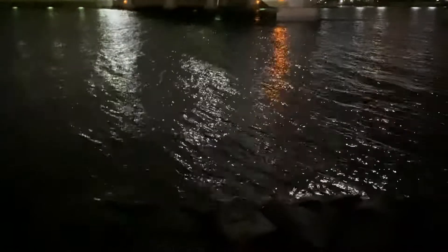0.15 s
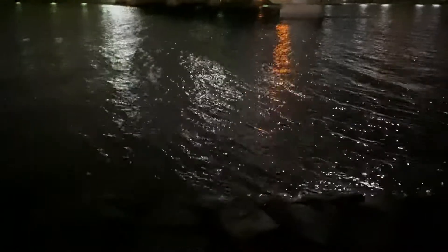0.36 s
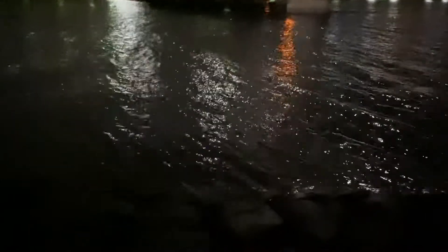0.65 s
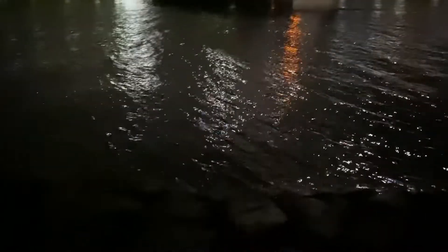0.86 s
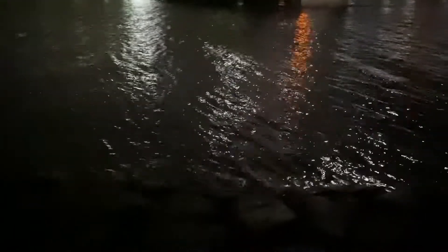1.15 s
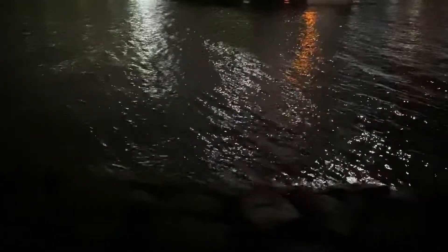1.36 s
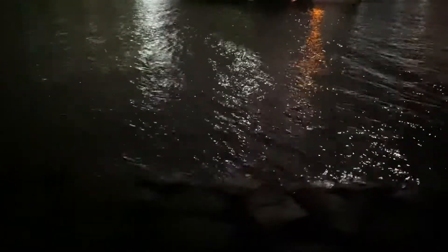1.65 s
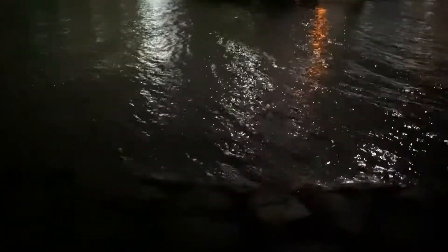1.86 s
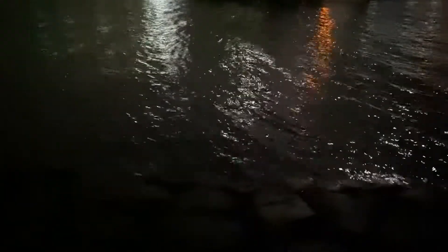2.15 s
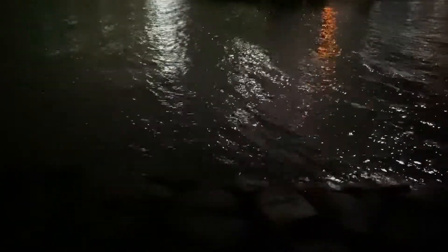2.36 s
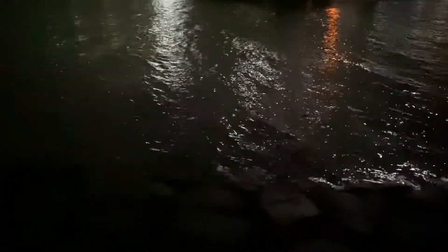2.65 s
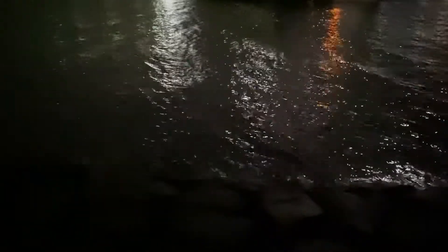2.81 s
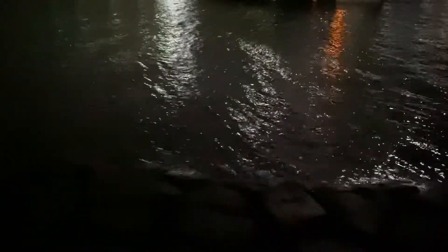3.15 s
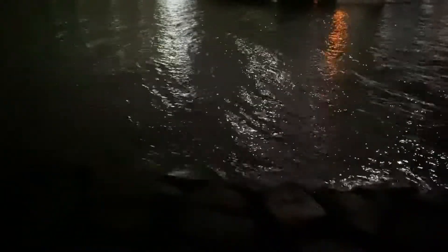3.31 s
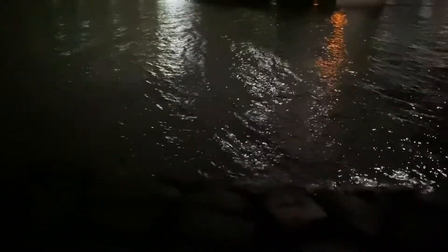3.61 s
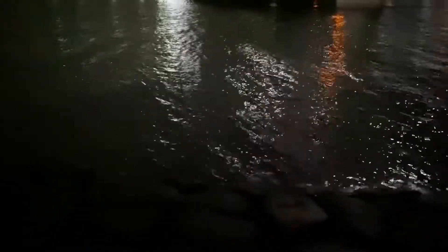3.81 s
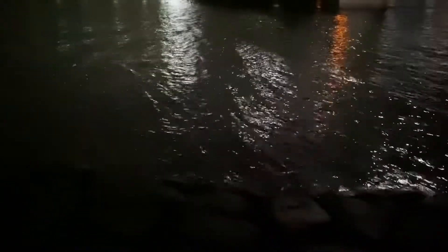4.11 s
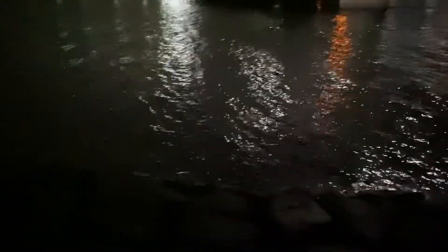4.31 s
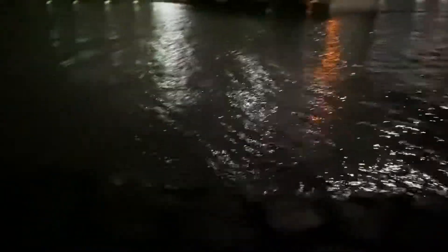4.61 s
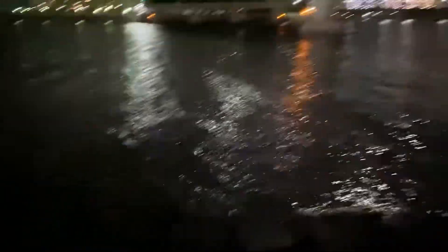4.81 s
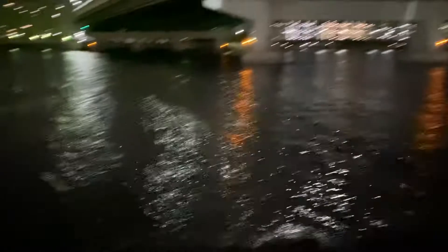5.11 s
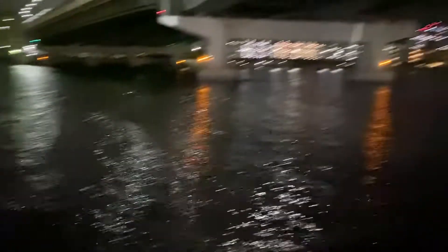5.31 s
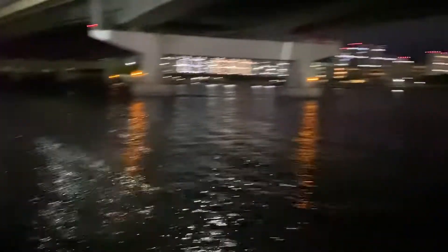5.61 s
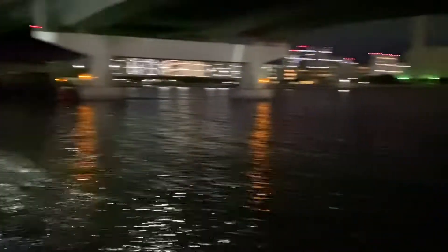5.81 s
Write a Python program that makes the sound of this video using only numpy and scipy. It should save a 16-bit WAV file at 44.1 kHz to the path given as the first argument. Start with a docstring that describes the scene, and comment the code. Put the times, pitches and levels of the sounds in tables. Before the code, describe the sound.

Small waves plop, slap and fizz among rocks at night, while wind rumbles on the microphone and a vehicle swells past on a bridge.

```python
"""Small waves slap, clap and fizz among rocks at the foot of a harbour seawall at night; drops fall back.
The water is built from bubble tones, ticks, short noise bursts and foam hiss, with a scattered tail.
A vehicle of shaped noise swells on a road bridge to the right and thumps over a joint.
Wind rumble buffets the microphone over the noise of a far city; the microphone turns towards the bridge."""
import sys
import numpy as np
from scipy import signal
from scipy.fft import rfft, irfft, next_fast_len
from scipy.io import wavfile
from scipy.ndimage import uniform_filter1d, map_coordinates

SR = 44100
rng = np.random.default_rng(int(sys.argv[2]) if len(sys.argv) > 2 else 0)


def bounce(signal):
    """Save signal as a 16-bit WAV file at the path given by the first command-line argument."""
    frames = np.transpose(np.atleast_2d(signal))
    limited = np.clip(frames, -1, 1)
    pcm = np.round(limited * 32767).astype(np.int16)
    wavfile.write(sys.argv[1], SR, pcm)


N = 262836
TIME = np.arange(N) / SR
FREQS = np.maximum(np.fft.rfftfreq(N, 1 / SR), 1)

# bearings run to the right from the microphone's first heading
TURN_START_S, TURN_LENGTH_S, TURN_DEG = 4.43, 0.94, 39.8
SPRAY_BEARING_DEG, ROAD_BEARING_DEG, PORT_LAG_MS = 35, 70.6, 0.39


def from_db(db):
    """Decibels to gain."""
    return 10 ** (np.asarray(db) / 20)


def rms_one(x):
    """Scale to unit rms."""
    return x / np.sqrt(np.mean(x ** 2) + 1e-20)


def at_hz(points, hz):
    """Interpolate a table on a log-frequency axis."""
    table_hz, value = np.transpose(points)
    return np.interp(np.log(hz), np.log(table_hz), value)


def drift(hz):
    """Slow random curve, rms 1, low-passed at hz."""
    return rms_one(irfft(rfft(rng.standard_normal(N)) / (1 + (FREQS / hz) ** 2), N))


def stereo_noise(colour, likeness):
    """Noise of the given colour, partly shared by both sides; rms 1."""
    mid, side = rfft(rng.standard_normal((2, N)))
    pair = np.sqrt(1 + likeness) * mid + np.sqrt(1 - likeness) * side * [[1], [-1]]
    return rms_one(irfft(pair * from_db(at_hz(colour, FREQS)) * (FREQS > 10), N))


def turned(s=TIME):
    """How far the microphone has turned, 0-1."""
    return np.clip((s - TURN_START_S) / TURN_LENGTH_S, 0, 1)


def lag_of(bearing_deg, s=TIME):
    """Lag of the left side in ms for a source at this bearing, as the microphone turns."""
    return PORT_LAG_MS * np.sin(np.radians(bearing_deg - TURN_DEG * turned(s)))


def from_right(pair, lag_ms):
    """Sound from the right reaches the left side later."""
    late = np.arange(pair.shape[1]) - lag_ms * SR / 1000
    left = map_coordinates(pair[0], [late], order=3, mode="nearest")
    return np.array([left, pair[1]])


def add(out, s, sound):
    """Mix a short sound in at time s."""
    part = out[max(int(s * SR), 0):][:len(sound)]
    part += sound[:len(part)]


def placed(sound, s, bearing_deg):
    """A short sound at time s from this bearing, as a stereo track."""
    out = np.zeros((2, N))
    add(out[0], s + lag_of(bearing_deg, s) / 1000, sound)
    add(out[1], s, sound)
    return out


# Far city spectrum. Each row: frequency in Hz, relative density in dB per Hz.
CITY_COLOUR_DB = [(30, 6), (100, 4.5), (220, 2), (300, 1), (380, 0), (600, -11), (850, -6.5), (1400, -16),
                  (2000, -18.5), (3000, -30.5), (4500, -36), (8000, -65), (16000, -54.5)]
# Left-right likeness of the city. Each row: frequency in Hz, likeness 0-1.
CITY_LIKENESS_BY_HZ = [(60, 1), (200, 0.81), (400, 0), (800, 0.05), (1500, 0.05), (5000, 1)]


def city(level_db=-49, bridge_share=0.36):
    """Far traffic arrives from all sides; part of its tyre noise comes from the bridge on the right."""
    share = bridge_share / (1 + (350 / FREQS) ** 4) / (1 + (FREQS / 1600) ** 6)
    around = rfft(stereo_noise(CITY_COLOUR_DB, at_hz(CITY_LIKENESS_BY_HZ, FREQS)))
    bridge = rfft(from_right(stereo_noise(CITY_COLOUR_DB, 1.0), lag_of(ROAD_BEARING_DEG)))
    return from_db(level_db) * irfft(np.sqrt(1 - share) * around + np.sqrt(share) * bridge, N)


RUMBLE_FLOOR_DB, GUST_ATTACK_S, GUST_RELEASE_S = -45.5, 0.01, 0.056
# Gusts on the microphone. Each row: start in seconds, hold in seconds, strength in dB.
GUST_EVENTS = [(0.83, 0.079, -44), (1.518, 0.33, -37.5), (1.819, 0.41, -31), (2.31, 0.11, -28.5),
               (2.44, 0.8, -38), (2.79, 0.042, -37), (2.928, 0.019, -31), (3.046, .025, -41),
               (3.272, 0.035, -26.5), (3.33, 0.16, -39), (3.534, 1.25, -30.5), (3.543, 0.067, -25),
               (3.685, 0.055, -27.5), (3.854, 0.042, -27), (4.046, 0.14, -25), (4.293, 0.02, -25.5),
               (4.524, 0.023, -24), (4.687, 0.046, -25.5), (4.824, 0.36, -35.5), (5.256, 0.43, -32),
               (5.513, 0.026, -30.5), (5.614, 0.031, -45), (5.756, 0.18, -33.5)]


def wind_strength():
    """Each gust rises quickly, holds and dies away, over a faint steady low rumble."""
    power = from_db(RUMBLE_FLOOR_DB) ** 2
    for start_s, hold_s, db in GUST_EVENTS:
        attack = np.clip((TIME - start_s) / GUST_ATTACK_S, 0, 1)
        release = np.exp(-np.maximum(TIME - start_s - hold_s, 0) / GUST_RELEASE_S)
        power = power + (from_db(db) * attack * release) ** 2
    return np.sqrt(power)


# Wind spectrum. Each row: frequency in Hz (doubled for the puffs), relative density in dB per Hz.
WIND_COLOUR_DB = [(18, -32), (30, -21.5), (40, -10), (50, 5.5), (64, 4.5), (80, 6), (105, -4), (140, -14),
                  (200, -29), (400, -44.5), (3000, -110)]
# Sharp puffs. Each row: centre in seconds, half width in seconds, level in dB.
PUFF_EVENTS = [(1.66, 0.13, -49.5), (1.908, 0.061, -38), (2.25, 0.26, -45), (2.68, 0.12, -51),
               (2.94, 0.074, -41), (3.11, 0.081, -42), (3.3, 0.028, -36.5), (4.201, 0.062, -35),
               (4.439, 0.024, -29), (4.571, 0.034, -34.5), (4.73, 0.037, -29)]


def wind(likeness=0.95, steadiness=0.51, low_cut_hz=35):
    """Eddies thud on both ports together; sharp puffs bring smaller, higher eddies."""
    eddies = stereo_noise(WIND_COLOUR_DB, likeness)
    local_power = uniform_filter1d(np.mean(eddies ** 2, axis=0), size=SR // 16)
    # partly level the chance swells of the noise
    rumble = wind_strength() * eddies / local_power ** (steadiness / 2)
    puffs = sum(from_db(db) * np.exp(-((TIME - s) / width_s) ** 2) for s, width_s, db in PUFF_EVENTS)
    buffet = puffs * stereo_noise([(2 * hz, db) for hz, db in WIND_COLOUR_DB], 0.88)
    high_pass = signal.butter(4, low_cut_hz, "high", fs=SR, output="sos")
    return signal.sosfilt(high_pass, rumble + buffet)


NEAREST_S, SPEED_M_PER_S, ROAD_DISTANCE_M = 5.19, 22.36, 33.1
# screened until it comes out on the open bridge
EMERGES_S, EMERGE_SPREAD_S, SCREEN_DB = 3.29, 0.15, -12.5


def drive_past():
    """Level in dB by distance and screening, and angle in radians to go, at a steady speed."""
    to_go_m = SPEED_M_PER_S * (NEAREST_S - TIME)
    spreading_db = 20 * np.log10(ROAD_DISTANCE_M / np.hypot(ROAD_DISTANCE_M, to_go_m))
    screened = .5 - .5 * np.tanh(.5 * (TIME - EMERGES_S) / EMERGE_SPREAD_S)
    return spreading_db + SCREEN_DB * screened, np.arctan2(to_go_m, ROAD_DISTANCE_M)


def patchy(pair, patchy_db, patch_hz, count=12):
    """Each stretch of the spectrum swells and fades by itself; rms 1."""
    place = np.interp(np.log(FREQS), np.log([250, 4000]), [0, count - 1])
    spectrum = rfft(pair)
    bands = (irfft(spectrum * np.maximum(1 - abs(place - k), 0), N) for k in range(count))
    return rms_one(sum(band * from_db(patchy_db * drift(patch_hz)) for band in bands))


# delay at the nearest point, its growth per radian still to go, level
ECHO_MS, ECHO_MS_PER_RAD, ECHO_DB = 17, 4.14, -13


def with_echo(pair, delay_ms):
    """Sound returning from under the bridge by a slowly changing path; power is kept."""
    late = np.arange(N) - delay_ms * SR / 1000
    echo = np.array([np.interp(late, np.arange(N), side) for side in pair])
    return (pair + from_db(ECHO_DB) * echo) / np.hypot(1, from_db(ECHO_DB))


# Tyres crossing the bridge joint. Each row: start in seconds, base level in dB, pitch in Hz.
THUMP_EVENTS = [(5.275, -23, 142), (5.306, -29, 313), (5.614, -27, 191)]
# Ringing deck spectrum. Each row: frequency in Hz, relative density in dB per Hz.
BOOM_COLOUR_DB = [(60, -3), (110, 5.5), (180, 6), (260, -5), (400, -15), (600, -23), (1000, -18),
                  (2000, -41), (5000, -78)]


def joint(boom_db=-9, boom_s=0.14, knock_db=7, knock_cycles=0.45):
    """Tyres knock on the bridge joint, and each knock makes the deck boom."""
    boom = knocks = 0
    for s, db, hz in THUMP_EVENTS:
        age = np.maximum(TIME - s, 0)
        boom = boom + from_db(db + boom_db) * (1 - np.exp(-age * hz)) * np.exp(-age / boom_s)
        swing = age * hz / knock_cycles
        pulse = 2 * swing * np.exp(-swing)
        knocks = knocks + from_db(db + knock_db) * np.sin(2 * np.pi * hz * age) * pulse
    return boom * stereo_noise(BOOM_COLOUR_DB, 0.99) + knocks


# Tyre roar spectrum. Each row: frequency in Hz, relative density in dB per Hz.
TYRE_COLOUR_DB = [(200, 0.5), (380, 6), (500, 0.5), (590, -1), (700, 1), (820, -1.5), (980, -1.5),
                  (1170, -5.5), (1450, -13.5), (1750, -14.5), (2200, -25.5), (3500, -34), (9000, -64),
                  (16000, -71)]
# Low drone spectrum. Each row: frequency in Hz, relative density in dB per Hz.
DRONE_COLOUR_DB = [(50, -0.5), (110, 12.5), (170, 9), (250, 9.5), (310, 0), (380, 2), (520, -8),
                   (800, -43.5), (5000, -102.5)]
# Hiss of air squeezed from the tread. Each row: frequency in Hz, relative density in dB per Hz.
TREAD_COLOUR_DB = [(500, -33), (1500, 6), (2100, 4.5), (2900, 1), (3700, -7), (5000, -14), (8000, -25.5),
                   (16000, -37)]
# Left-right likeness of the road. Each row: frequency in Hz, likeness 0-1.
ROAD_LIKENESS_BY_HZ = [(100, 0.88), (250, 0.83), (600, 0.65), (1100, 0.52), (2000, 0.84), (4000, 0.19),
                       (8000, 0.34)]
# unscreened at the nearest distance: tyres, drone at right angles, tread on its beam
TYRE_DB, DRONE_DB, TREAD_DB = -36.5, -39.5, -55.5
DRONE_AHEAD_DB = 7.5   # extra drone thrown forwards
# tread hiss is beamed a little ahead; loss at right angles to the beam
TREAD_BEAM_DEG, TREAD_BEAM_DB = 6.4, 21


def vehicle(bass_lag=1.72, bend_hz=760):
    """Tyre roar and tread hiss, each swelling and fading at random by bands, over a low drone."""
    passing_db, angle = drive_past()
    off_beam = angle - np.radians(TREAD_BEAM_DEG)
    tyre_db = TYRE_DB + passing_db
    drone_db = DRONE_DB + passing_db + DRONE_AHEAD_DB * np.sin(angle)
    tread_db = TREAD_DB + passing_db + TREAD_BEAM_DB * (np.cos(off_beam) - 1)
    alike = at_hz(ROAD_LIKENESS_BY_HZ, FREQS)
    roar = from_db(tyre_db) * patchy(stereo_noise(TYRE_COLOUR_DB, alike), patchy_db=2.0, patch_hz=14)
    hiss = from_db(tread_db) * patchy(stereo_noise(TREAD_COLOUR_DB, alike), patchy_db=2.3, patch_hz=25)
    drone = from_db(drone_db) * stereo_noise(DRONE_COLOUR_DB, alike)
    sound = with_echo(roar + hiss + drone, ECHO_MS + ECHO_MS_PER_RAD * angle) + joint()
    # long waves bend round the microphone and lag more
    bass = irfft(rfft(sound) / (1 + (FREQS / bend_hz) ** 10), N)
    lag_ms = lag_of(ROAD_BEARING_DEG + np.degrees(angle))
    return from_right(sound - bass, lag_ms) + from_right(bass, bass_lag * lag_ms)


def bubble(hz, t60, tick_db, tick_s=0.00077, rise=0.038, attack_s=0.00042):
    """A tick as the surface breaks, then a trapped bubble whose pitch rises as it dies; height about 1."""
    t = TIME[:SR // 20]
    pitch_hz = hz * (1 + rise * np.minimum(t / t60, 1))
    tone = np.sin(2 * np.pi * np.cumsum(pitch_hz) / SR) * np.exp(-np.log(1000) * t / t60)
    radius, turn = np.exp(-2.5 * hz / SR), 2 * np.pi * hz / SR
    resonance = [1, -2 * radius * np.cos(turn), radius * radius]
    tick = rng.standard_normal(len(t))
    for _ in range(2):      # a big bubble breaks with a dull tick
        tick = signal.lfilter([1, 0, -1], resonance, tick)
    click = from_db(tick_db) * rms_one(tick) * np.exp(-t / tick_s)
    return (tone + click) * (1 - np.exp(-t / attack_s))


TRICKLE_DB, WASH_RISE_S, WASH_DRAIN_S = -75.5, 0.2, 0.31
# Waves washing in among the rocks. Each row: crest in seconds, fizz strength in dB.
WASH_EVENTS = [(.28, -73.5), (.98, -71), (1.38, -76.5), (2.17, -66), (2.41, -69.5), (3.021, -64.5),
               (3.421, -67), (4.2, -74), (4.8, -70.5), (5.5, -69.5)]


def foam_strength():
    """Each wave whips up foam that drains away, over a constant trickle."""
    power = from_db(TRICKLE_DB) ** 2
    for crest_s, db in WASH_EVENTS:
        swell = np.exp(-np.maximum((crest_s - TIME) / WASH_RISE_S, (TIME - crest_s) / WASH_DRAIN_S))
        power = power + (from_db(db) * swell) ** 2
    return np.sqrt(power)


# Bubble levels. Each row: frequency in Hz, relative level in dB per bubble size.
FIZZ_COLOUR_DB = [(900, -7), (1800, 3.5), (3000, 5.5), (5000, 5), (7200, 6.5), (10000, -1), (15000, -12.5)]
# Fine foam hiss spectrum. Each row: frequency in Hz, relative density in dB per Hz.
FOAM_COLOUR_DB = [(300, -31.5), (1500, -4), (3000, 2), (5500, -9), (7500, -3.5), (10000, -13.5),
                  (16000, -14.5)]
TURNED_AWAY_DB = -1   # loss once the microphone has turned from the rocks


def fizz(level_db=2.0, spread_db=3.5, cycles=42, tick_db=-5, foam_db=-2, flicker_db=2, count=2000):
    """Tiny bubbles of all sizes burst here and there among the rocks, over the hiss of foam."""
    out = np.zeros((2, N))
    for when, size, strength, place in rng.random((count, 4)):
        s, hz = when * N / SR, 1000 * 15 ** size
        db = at_hz(FIZZ_COLOUR_DB, hz) + level_db - spread_db * np.log(max(strength, .09))
        pop = from_db(db) * bubble(hz, cycles / hz, tick_db)
        add(out[1], s, pop)
        add(out[0], s + (place - .55) / 4000, pop)
    foam = from_db(foam_db + flicker_db * drift(42)) * stereo_noise(FOAM_COLOUR_DB, 0.62)
    return (out + foam) * foam_strength() * from_db(TURNED_AWAY_DB * turned())


# Spray landing on stone. Each row: start in seconds, relative level in dB.
TICK_EVENTS = [(0.4803, -50), (1.0211, -51), (1.0364, -59), (1.1034, -43.5), (1.1104, -53), (1.3309, -48),
               (1.4012, -49), (1.4207, -50), (2.1306, -44), (2.3625, -47), (2.5037, -50), (2.5536, -43.5),
               (2.7774, -53), (2.9966, -56), (3.0145, -46), (3.9544, -44), (4.0233, -56), (4.3665, -53),
               (4.7321, -49), (5.0144, -47), (5.466, -44), (5.4974, -55)]


def spray(level_db=-2, decay_s=0.00097, low_hz=2200, high_hz=9000):
    """Flying droplets hit the stone with a dry, bright click of band-passed noise."""
    out, t = np.zeros(N), TIME[:SR // 100]
    for s, db in TICK_EVENTS:
        add(out, s, from_db(db + level_db) * rng.standard_normal(len(t)) * np.exp(-t / decay_s))
    band = signal.butter(1, [low_hz, high_hz], "band", fs=SR, output="sos")
    return signal.sosfilt(band, out + 1e-18)


# Nearest drops. Each row: start in seconds, level in dB, pitch in Hz,
# t60 in seconds before ring_share, bearing in degrees.
DROP_EVENTS = [(.236, -41, 760, 0.049, 38), (.246, -49, 2800, 0.018, 23), (0.266, -57, 7360, 0.029, 35),
               (0.437, -40, 1010, 0.04, 30), (.440, -41, 726, 0.041, 33), (.465, -49, 1700, 0.041, 7),
               (.480, -45, 1270, .018, 7), (0.483, -33, 395, 0.036, 7), (.515, -58, 1280, .02, 7),
               (0.52, -44, 1680, 0.052, 7), (.672, -53, 5370, 0.02, 4), (0.866, -46, 1600, .025, 9),
               (0.963, -54, 1610, .02, 7), (1.022, -48, 1950, .018, 7), (1.106, -41, 1500, .014, 3),
               (1.291, -48.5, 3860, 0.013, -4), (1.422, -42, 2180, 0.017, 78), (1.843, -48, 3620, 0.014, 9),
               (1.924, -48, 2610, 0.02, 10), (1.988, -41, 810, 0.022, 30), (2.138, -37, 3370, 0.02, 39),
               (2.177, -45, 3500, 0.014, 39), (2.194, -38, 2000, 0.016, 39), (2.323, -36, 820, 0.042, 41),
               (2.349, -35, 2050, 0.016, 25), (2.382, -50, 7550, 0.018, 36), (2.388, -37, 1170, 0.02, 39),
               (2.402, -40, 3460, 0.019, 40), (2.411, -38.5, 4300, 0.017, 40),
               (2.496, -52.5, 4600, .015, 30), (2.62, -46, 2070, .02, 11), (2.677, -54, 2900, 0.029, 12),
               (2.833, -34, 1320, 0.015, 10), (2.907, -53, 6240, 0.0089, -1),
               (3.116, -42.5, 2330, 0.023, -4), (3.254, -55, 6940, 0.0097, -4),
               (3.501, -52, 6040, 0.0084, -5), (3.534, -55.5, 6500, 0.023, 0), (3.6, -55, 4100, 0.041, 45),
               (3.643, -25, 1150, 0.025, 40), (3.896, -65, 6960, 0.03, 19), (4.046, -54, 4800, 0.025, 21),
               (4.107, -57, 6500, 0.025, 19), (4.182, -61.5, 6940, 0.027, 22),
               (4.277, -48, 6670, 0.019, 18), (4.732, -54, 7300, 0.014, 19),
               (4.754, -49.5, 5200, 0.027, 16), (5.374, -37.5, 2200, 0.023, 26),
               (5.391, -42, 3370, 0.02, 22), (5.466, -45, 6350, 0.012, 32), (5.912, -53.5, 6440, 0.025, 41)]


def drops(tick_db=-2, tick_db_per_octave=13.0, tick_s=0.0015, ring_share=0.66, attack_cycles=1.0):
    """The nearest drops are heard one by one: large ones plop, small ones mostly tick."""
    out = np.zeros((2, N))
    for s, db, hz, t60, bearing_deg in DROP_EVENTS:
        crisp_db = tick_db + tick_db_per_octave * np.clip(np.log2(hz / 6000), -1, 0)
        plop = bubble(hz, t60 * ring_share, crisp_db, tick_s, attack_s=attack_cycles / hz)
        out += placed(from_db(db) * plop, s, bearing_deg)
    return out


# Pockets of water clapping shut against stone. Each row: start in seconds, level in dB over 5 ms,
# pitch in Hz, low-pass cutoff in Hz, bearing in degrees.
CLAP_EVENTS = [(0.246, -53, 2680, 4200, 31), (0.266, -61, 6800, 8500, 35), (0.294, -66, 6200, 7500, 32),
               (1.989, -51, 900, 2500, 37), (2.149, -55, 6000, 9000, 39), (2.155, -47, 3300, 9000, 41),
               (2.167, -50, 4300, 9000, 36), (2.175, -52, 3900, 8000, 36), (2.19, -50, 3900, 8000, 39),
               (2.322, -49, 900, 6000, 41), (2.329, -51, 2000, 5970, 25), (2.387, -48, 1200, 3500, 35),
               (2.433, -49, 1300, 5000, 29), (3.635, -54, 2500, 4500, 38), (3.644, -43, 1400, 4500, 46),
               (4.732, -48, 1710, 3300, 16), (5.368, -39, 895, 3900, 32), (5.3737, -44, 1900, 3700, 25),
               (5.385, -48, 2400, 4000, 21), (5.3895, -43.5, 2120, 3900, 23.4)]


def claps(attack_s=0.00033, decay_s=0.0013, width=1.16):
    """Each clap is a short, dull noise burst around one pitch, low-passed."""
    out, t = np.zeros((2, N)), TIME[:SR // 25]
    envelope = (1 - np.exp(-t / attack_s)) * np.exp(-t / decay_s)
    for s, db, hz, cutoff_hz, bearing_deg in CLAP_EVENTS:
        hollow = signal.butter(1, [hz / width, hz * width], "band", fs=SR, output="sos")
        low_pass = signal.butter(8, cutoff_hz, fs=SR, output="sos")
        burst = signal.sosfilt(np.vstack([hollow, low_pass]), envelope * rng.standard_normal(len(t)))
        burst /= np.sqrt(np.sum(burst ** 2) / (.005 * SR))
        out += placed(from_db(db) * burst, s, bearing_deg)
    return out


# Wavelets slapping the rocks. Each row: start in seconds, length in seconds, level in dB over that length,
# bubble pitch in Hz, spread in octaves before octave_scale, bearing in degrees.
SLAP_EVENTS = [(0.169, 0.23, -66.5, 1700, 0.74, 27), (0.241, 0.057, -55.5, 735, 0.43, 38),
               (0.419, 0.11, -61.5, 1240, 0.58, 14), (0.477, 0.013, -68, 5230, 1.2, 12),
               (1.291, 0.0061, -58, 6700, 0.12, 0), (1.39, 0.036, -62.5, 2720, 0.84, 75),
               (2.097, 0.036, -58, 1880, 0.7, 14), (2.138, 0.065, -55.5, 3900, 0.75, 36),
               (2.145, 0.16, -55.5, 1390, 0.78, 30.5), (2.209, 0.031, -45.5, 713, 0.47, 50),
               (2.24, 0.013, -64, 3000, 0.37, 43), (2.297, 0.038, -56, 2370, 0.48, 38),
               (2.315, 0.033, -43, 755, 0.64, 39), (2.347, 0.13, -51.5, 1230, 0.67, 34),
               (2.648, 0.04, -54.5, 645, 0.3, 20), (2.848, 0.05, -56.5, 387, 0.48, 29),
               (3.038, .025, -50.5, 730, 0.45, 35), (3.575, 0.041, -58, 2090, 0.8, 60),
               (3.633, 0.035, -46.5, 1320, 0.78, 49), (4.723, 0.05, -66, 4300, 1, 13),
               (5.372, 0.021, -50, 1910, 0.56, 30), (5.488, 0.04, -62, 4600, 0.99, 32)]


def slaps(spread_db=4.5, cycles=18, octave_scale=0.92, tick_db=-8, fan_deg=9, count=90):
    """A wavelet traps bubbles around one size, fanned along the rocks; births swell quickly and thin out."""
    out = np.zeros((2, N))
    for s, length_s, db, pitch_hz, octaves, bearing_deg in SLAP_EVENTS:
        cloud = np.zeros((2, SR // 2))
        births_s = rng.triangular(0, .25, 1.2, count) * length_s
        traits = np.clip(rng.standard_normal((count, 3)), -2, 2)
        for birth_s, (size, strength, place) in zip(births_s, traits):
            hz = np.clip(pitch_hz * 2 ** (octave_scale * octaves * size), 300, 14000)
            pop = from_db(spread_db * strength) * np.sqrt(hz / pitch_hz) * bubble(hz, cycles / hz, tick_db)
            add(cloud[0], birth_s + lag_of(bearing_deg + fan_deg * place, s) / 1000, pop)
            add(cloud[1], birth_s, pop)
        cloud *= from_db(db) * np.sqrt(length_s * SR / np.sum(cloud[1] ** 2))
        add(out[0], s, cloud[0])
        add(out[1], s, cloud[1])
    return out


def rocks(pair, t60=0.048, level_db=-9):
    """Boulders and wall scatter a short tail, different on each side."""
    t = TIME[:SR // 4]
    scatter = rng.standard_normal((2, len(t))) * np.exp(-np.log(1000) * t / t60) * (t > .002)
    scatter /= np.sqrt(np.sum(scatter ** 2, axis=1, keepdims=True))
    return pair + from_db(level_db) * signal.fftconvolve(pair, scatter, axes=1)[:, :N]


def scene():
    """Water close by among the rocks, road and city beyond, wind on top."""
    clicks = spray()
    spray_pair = from_right(np.array([clicks, clicks]), lag_of(SPRAY_BEARING_DEG))
    water = fizz() + slaps() + claps() + drops() + spray_pair
    return rocks(water) + vehicle() + city() + wind()


# Left-right tilt. Each row: frequency in Hz, left minus right in dB.
BALANCE_DB = [(150, 0.2), (400, -1), (750, -3.5), (1050, -3), (1600, 0), (2800, 2), (5000, 4), (7500, 0)]


def record(dry, merge_hz=6100, late_samples=10, cutoff_hz=15900):
    """Tilts bands left-right; above merge_hz the left is an inverted, delayed right; low-passed at cutoff_hz."""
    before = SR // 10
    after = next_fast_len(N + SR // 5) - N - before
    padded = np.pad(dry, [(0, 0), (before, after)], mode="reflect", reflect_type="odd")
    length = padded.shape[1]
    hz = np.maximum(np.fft.rfftfreq(length, 1 / SR), 1)
    left, right = rfft(padded)
    merged = 1 / (1 + (merge_hz / hz) ** 20)
    copy = -right * np.exp(-2j * np.pi * hz * late_samples / SR)
    left = np.sqrt(1 - merged) * left + np.sqrt(merged) * copy
    tilt = from_db(at_hz(BALANCE_DB, hz) * [[.5], [-.5]])
    pair = irfft(np.array([left, right]) * tilt, length)
    low_pass = signal.ellip(10, .1, 80, cutoff_hz, fs=SR, output="sos")
    return signal.sosfilt(low_pass, pair)[:, before:][:, :N]


dry = scene()
out = record(dry)
bounce(out)
```